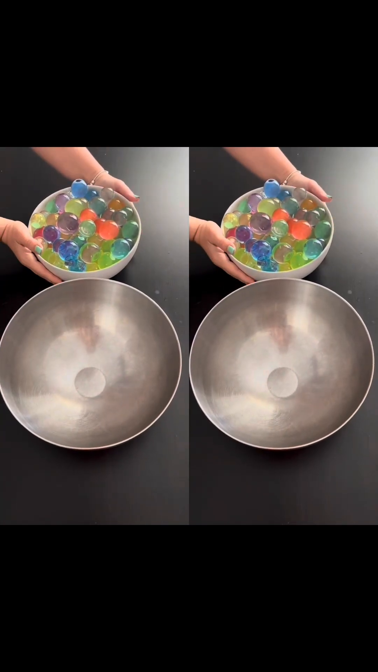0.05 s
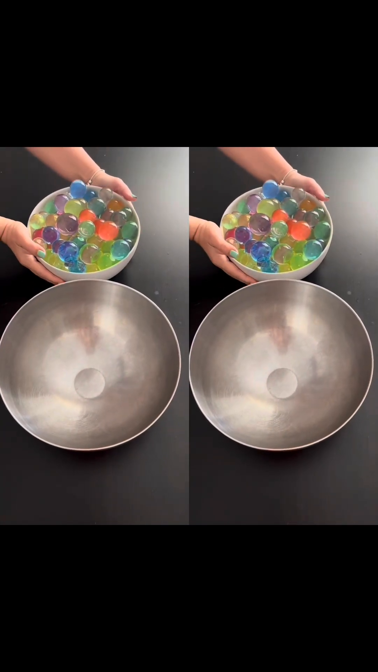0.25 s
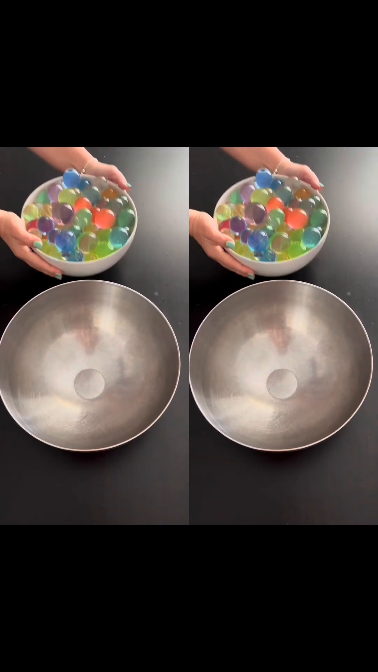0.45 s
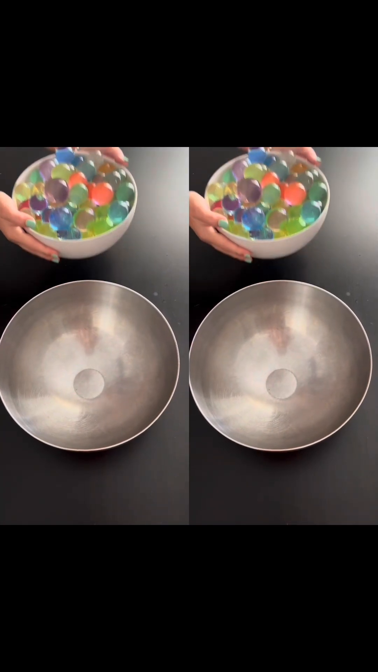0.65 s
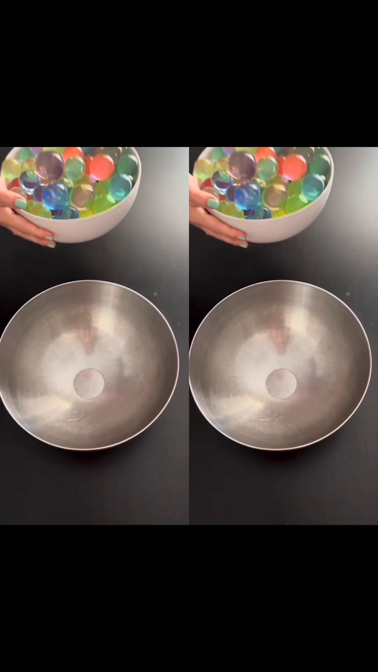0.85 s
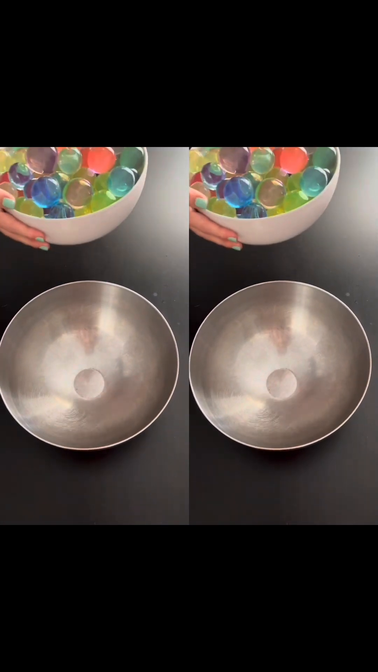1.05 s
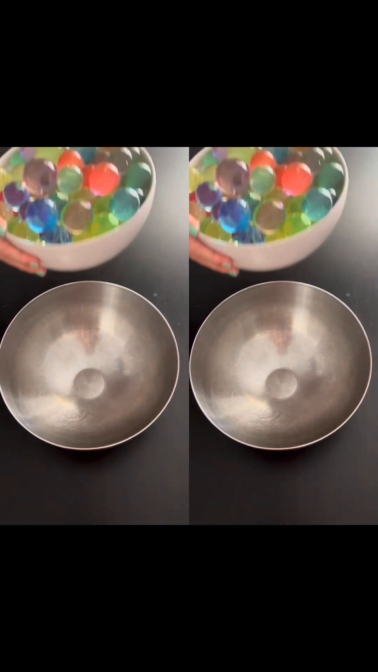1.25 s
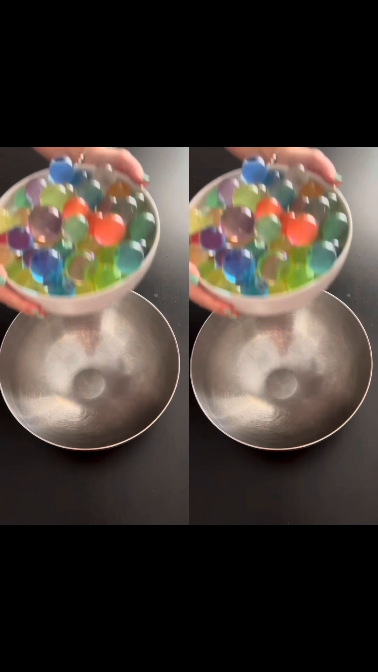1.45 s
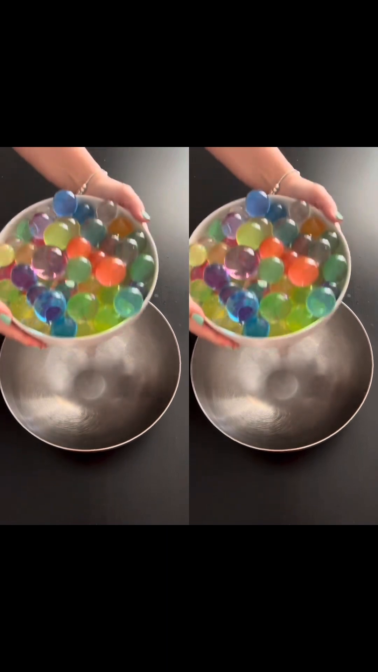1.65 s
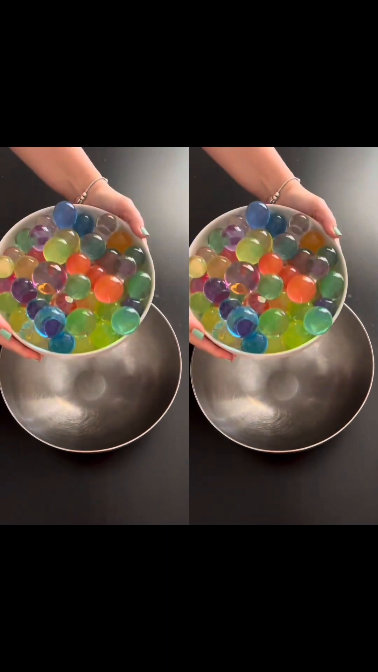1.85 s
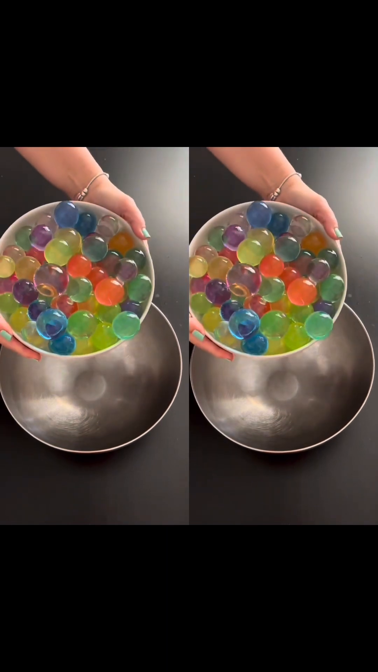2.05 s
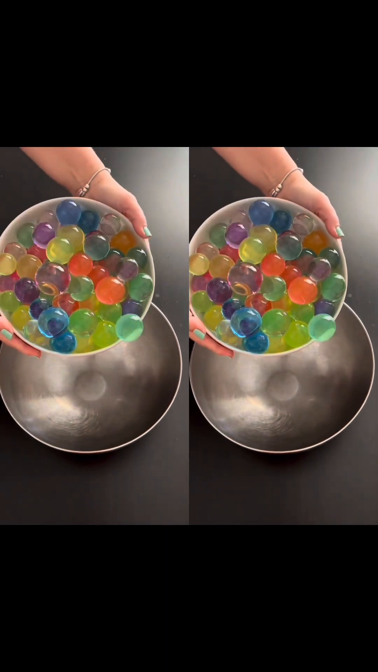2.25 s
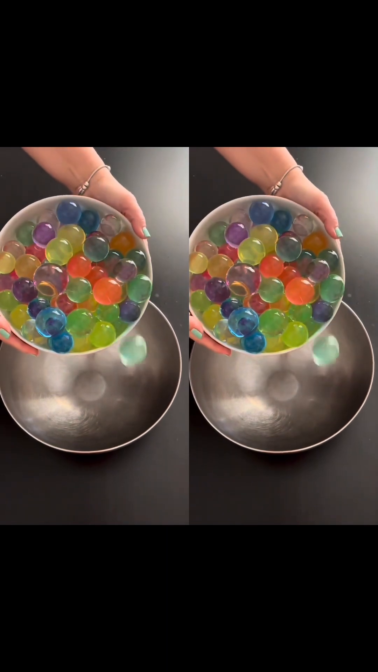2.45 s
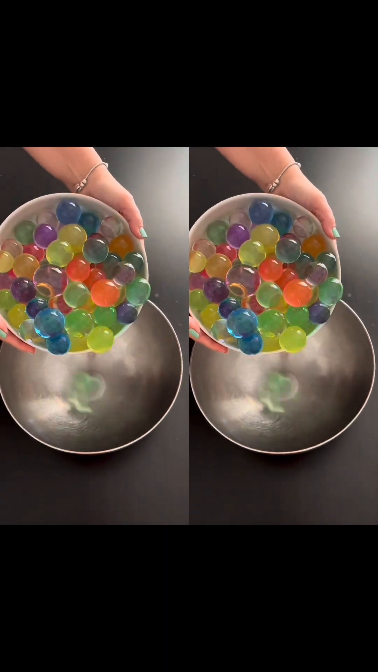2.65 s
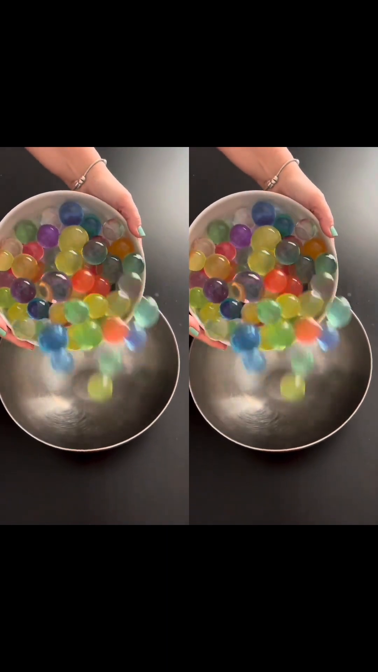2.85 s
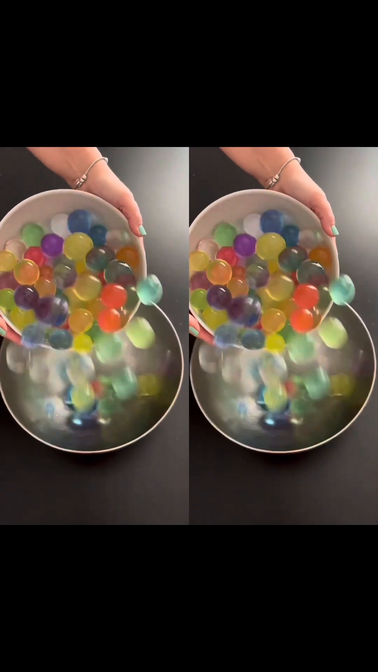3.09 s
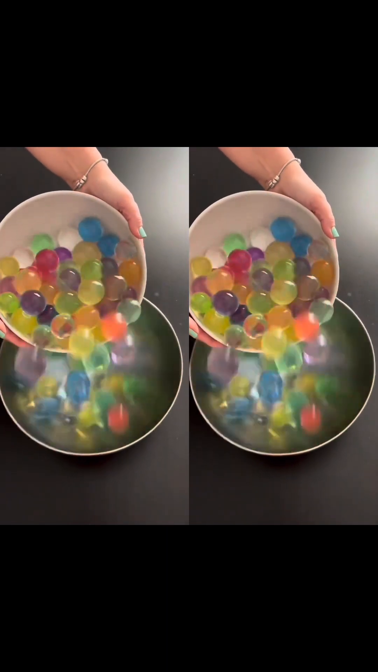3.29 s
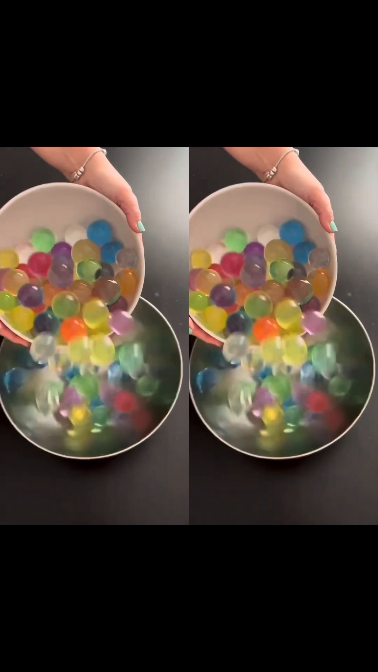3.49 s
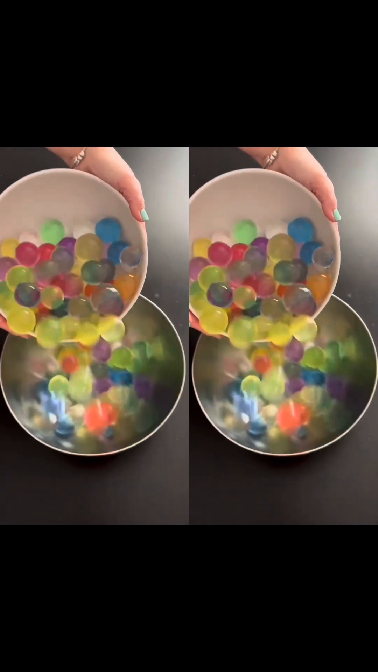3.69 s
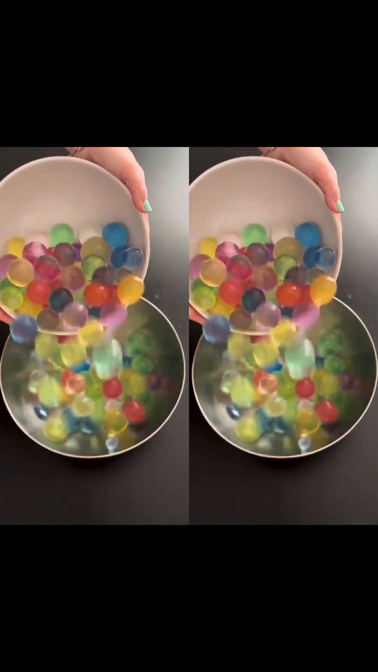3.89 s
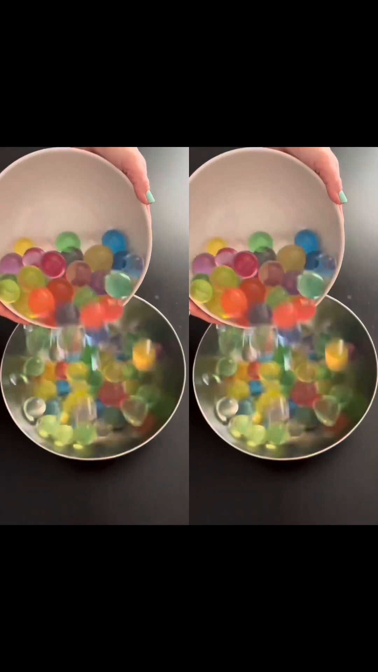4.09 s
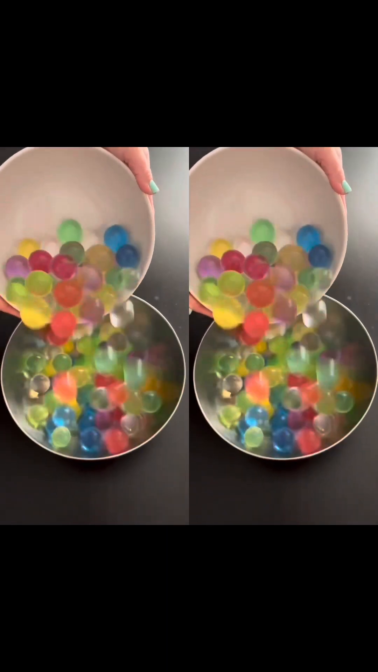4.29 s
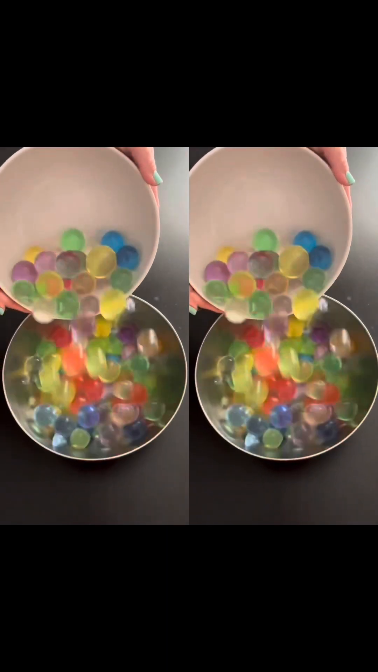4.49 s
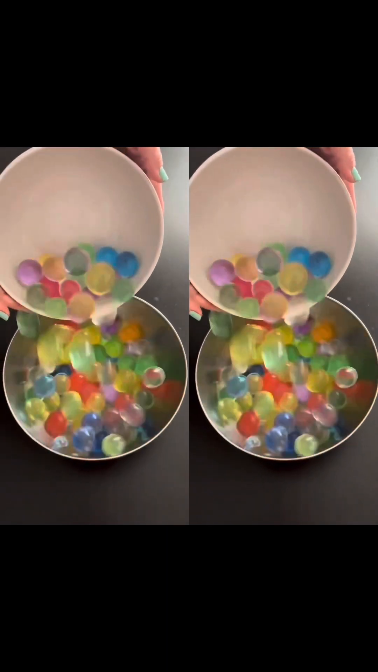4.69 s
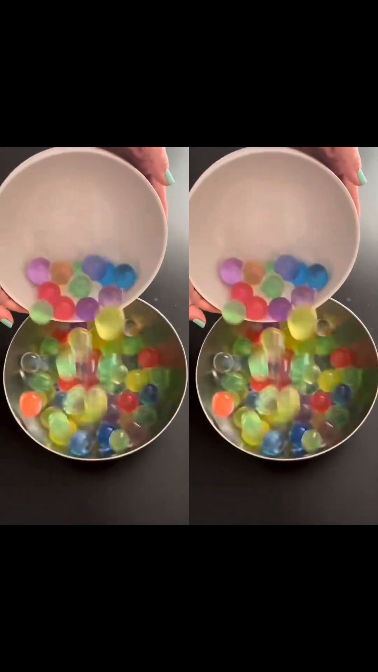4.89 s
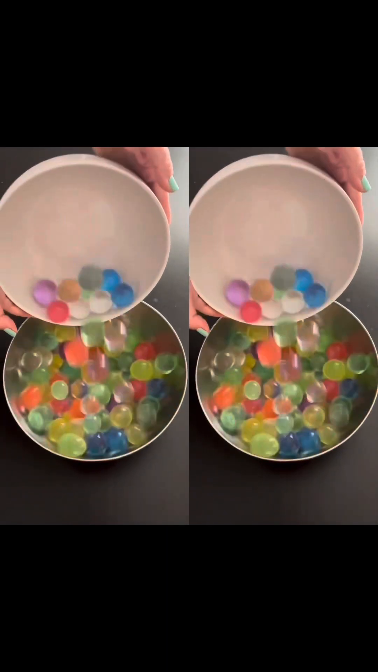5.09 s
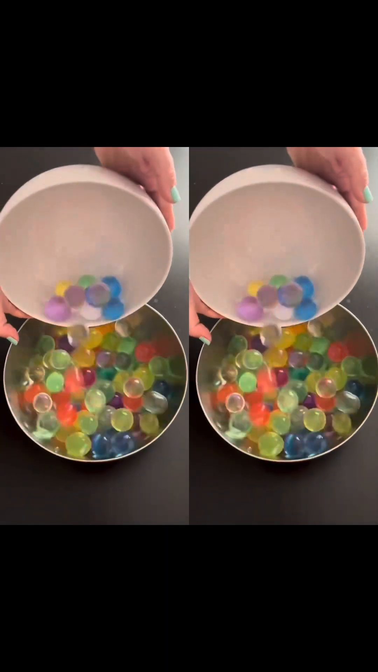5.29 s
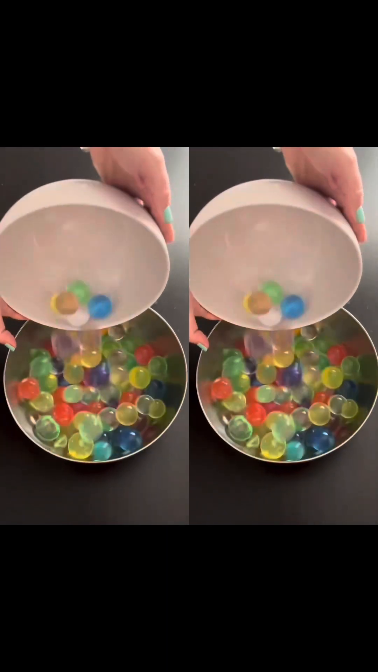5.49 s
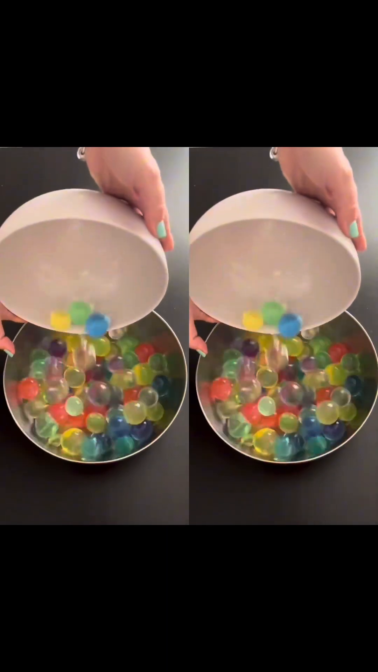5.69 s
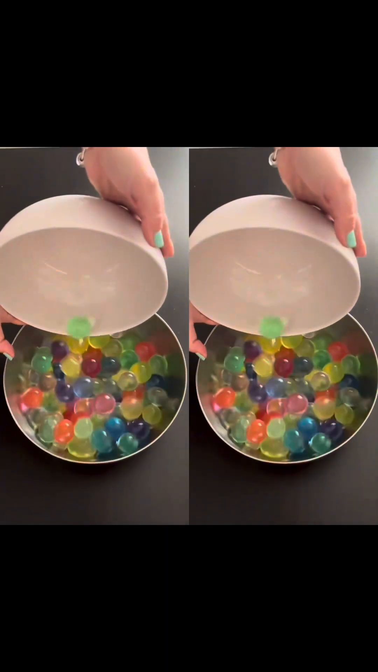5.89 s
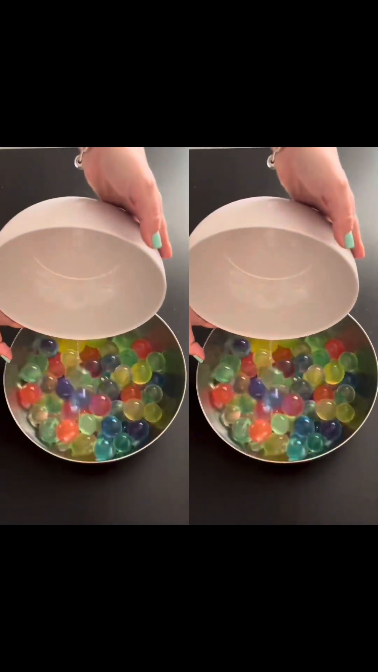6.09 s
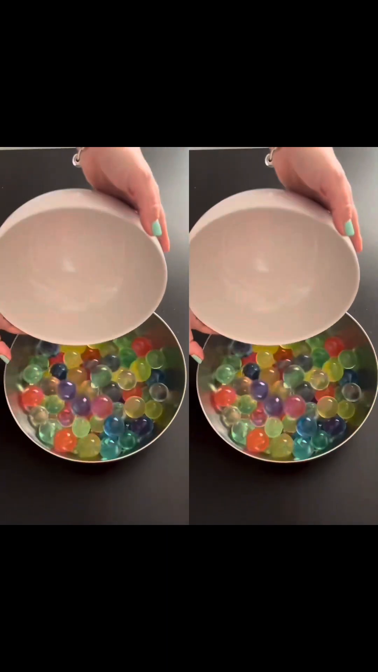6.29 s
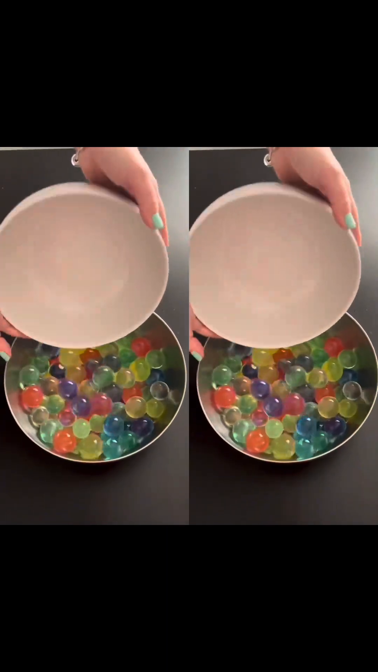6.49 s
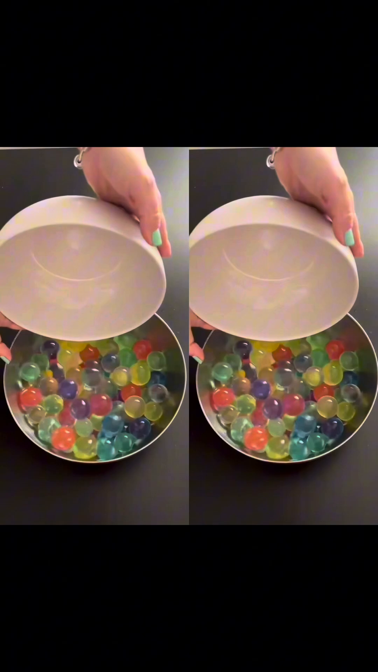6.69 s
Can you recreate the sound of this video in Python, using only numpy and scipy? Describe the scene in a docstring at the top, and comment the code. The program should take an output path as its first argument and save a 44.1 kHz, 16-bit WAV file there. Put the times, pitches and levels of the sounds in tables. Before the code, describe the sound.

After a faint thump and rustle, slippery gel beads tumble into an empty metal bowl with wet slaps, low thuds and brief clanging.

```python
"""On a table in a quiet, humming room, soft wet beads are tipped into a thin metal bowl.
A two-port microphone stands close above. Each landing pushes on the low modes of bowl and table,
water films burst in slaps of coloured noise with pitched plips, and beads smack on beads.
The first heavy beads make the still empty bowl chatter on its base, so that wall and rim ring.
A hand thumps the full bowl at both ends and makes it rustle at the start."""
import sys
import numpy as np
from scipy import signal
from scipy.fft import rfft, irfft, next_fast_len
from scipy.io import wavfile

SR = 44100
rng = np.random.default_rng(int(sys.argv[2]) if len(sys.argv) > 2 else 0)


def bounce(signal):
    """Save signal as a 16-bit WAV file at the path given by the first command-line argument."""
    frames = np.transpose(np.atleast_2d(signal))
    limited = np.clip(frames, -1, 1)
    pcm = np.round(limited * 32767).astype(np.int16)
    wavfile.write(sys.argv[1], SR, pcm)


N = 297542
TIME = np.arange(N) / SR

# Noise spectrum of the room air: (frequency [Hz], density [dB per Hz])
ROOM_SPECTRUM = [(15, -37.5), (40, -5), (86, 2), (125, -11), (240, -10.5), (400, -17.5), (600, -17),
                 (800, -19.5), (1400, -22.5), (2000, -33.5), (3000, -41), (8000, -50), (16000, -59.5)]
# Background, sinking after the pour: (time [s], air level [dB], hum level [dB], whine level [dB])
BACKGROUND = [(0, -56.5, -63.5, -83), (.3, -63, -67, -90), (.6, -63, -70.5, -81.5), (1.2, -65, -72.5, -75),
              (1.8, -62, -73, -76), (2.1, -65, -70.5, -69.5), (2.4, -65.5, -75.5, -74.5),
              (3, -63, -78, -87.5), (6.2, -76, -83, -95), (6.75, -74, -82.5, -100)]
# Share of air noise common to both ports, limited to 0-1: (frequency [Hz], likeness [1])
ROOM_LIKENESS = [(60, 1), (240, 0.71), (950, -1.4), (3770, -0.14), (15000, 0.23)]
# Resonances of the whine: (frequency [Hz], width [Hz], level [dB])
WHINE_MODES = [(461.6, 2.7, 9.5), (907.4, 11, -5), (1480, 150, -17)]
# Reverberation time of the room: (frequency [Hz], t60 [s])
ROOM_T60 = [(100, 0.21), (1000, 0.48), (5000, .25), (14000, 0.085)]
# Microphone noise spectrum: (frequency [Hz], density [dB per Hz])
HISS_SPECTRUM = [(1000, 0), (8000, -2.5), (10000, 2), (13000, 1), (15500, -13.5)]
# Four samples of lead, for sound from afar and through the table: (frequency [Hz], left lead [rad])
FAR_LEAD = [(0, 0), (SR / 2, 4 * np.pi)]
# Equal level at both ports: (frequency [Hz], left over right [dB])
EQUAL_TILT = [(0, 0)]
# Phase between the ports, for beads and for knocks: (frequency [Hz], left lead [rad])
BEAD_LEAD = [(0, 0), (1810, -0.1), (2840, 2.7), (5000, 1.1), (7240, 6.1), (9390, 6.3), (9730, 9.2),
             (11600, 9.6), (12400, 12.6), (14500, 12.5), (15200, 15.7), (16000, 15.6)]
KNOCK_LEAD = [(0, 0), (950, -1.0), (2580, 2.2), (5080, 1.3), (7320, 6.3), (9470, 6.3), (10100, 9.5),
              (11600, 9.5), (12000, 12.6), (14400, 12.4), (15200, 15.7), (16000, 15.6)]
# Level between the ports, for beads and for knocks: (frequency [Hz], left over right [dB])
BEAD_TILT = [(60, 0.0), (180, 0.0), (550, -0.5), (1650, -2.5), (4970, -0.5), (15000, 0.0)]
KNOCK_TILT = [(60, 0.0), (130, 0.0), (290, -1.0), (640, -4.0), (1410, -5.0), (3100, -1.5), (6820, -0.5),
              (15000, 0.0)]
# The pour, as reference levels: (time [s], thudding level [dB], wet patter level [dB])
POUR = [(2.47, -54, -79), (2.68, -34, -72), (2.79, -41, -75), (3.0, -20, -36), (3.06, -32, -41),
        (3.13, -40, -35), (3.2, -25, -44), (3.37, -26.5, -41), (3.43, -36, -43.5), (3.64, -21, -48),
        (3.8, -30, -50.5), (4.2, -27.5, -48), (4.45, -25, -56), (4.59, -32, -53.5), (4.66, -27, -56.5),
        (4.9, -29.5, -52.5), (5.23, -42.5, -65.5), (5.47, -43, -73.5), (5.85, -55.5, -87), (6.42, -78, -99),
        (6.75, -58.5, -91)]
# Thumps of the hand on the full bowl at both ends, and of heavy landings between:
# (time [s], level [dB], share of upper modes [0-1], deep ring [Hz])
THUDS = [(0.155, -40.5, 0.16, 141.7), (0.171, -36, 0.5, 115.5), (0.197, -36.5, 0.97, 128),
         (0.236, -44, 0.66, 112), (2.503, -29, 0.4, 116), (2.593, -17.5, 0.45, 128.7),
         (2.674, -16.5, 0.36, 132.7), (2.791, -23, 0.47, 119), (2.882, -17.5, 0.35, 124),
         (2.956, -18.5, 0.2, 112), (2.973, -24, 0.56, 144), (3.085, -18, 0.2, 132), (3.145, -13, 0.48, 128),
         (3.198, -14.5, 0.6, 120), (3.343, -25.5, 0.66, 135), (3.427, -26.5, 0.07, 132),
         (3.552, -12.5, 0.35, 127.7), (3.581, -18, 0.03, 124), (3.639, -10.5, 0.62, 143),
         (3.738, -15, 0.38, 127.5), (3.857, -10.5, 0.65, 144.7), (3.891, -19, 0.9, 138),
         (3.975, -23, 0.62, 160), (4.088, -18.5, 0.42, 135.8), (4.169, -22.5, 0.7, 153),
         (4.312, -15.5, 0.6, 149), (4.538, -28.5, 0.1, 147), (4.619, -15, 0.59, 141.2),
         (4.699, -31, 0.3, 139), (4.741, -20.5, 0.3, 136), (4.909, -30, 0.25, 143),
         (5.058, -25, 0.12, 142.6), (5.108, -24.5, 0.36, 133.5), (5.161, -30.5, 0.6, 151.3),
         (5.394, -33, 0.78, 143), (5.429, -35, 0.94, 130.7), (5.519, -43, 0, 123.1),
         (5.64, -42.5, 0.66, 113.5), (5.692, -37.5, 0.42, 168), (5.819, -50.5, 0.45, 145.5),
         (5.928, -47.5, 0.5, 174.6), (6.068, -52, 0.63, 146.6), (6.108, -50, 0.5, 174),
         (6.669, -50.5, 0.52, 172.6), (6.71, -60.5, 0.6, 159)]
# Low modes of bowl and table top: (frequency [Hz], width [Hz], level [dB])
BODY_MODES = [(95, 43, -7.5), (136.1, 6.4, 5), (165, 24, -7.5), (244.3, 9.7, 0.5), (270.2, 10, -3.5),
              (277, 16, -4), (337, 120, -12), (467, 50, -15), (590, 34, -10.5), (703, 230, -20.5)]
# Knocks of the base on the table: (time [s], wall ring level [dB], rim ring level [dB])
KNOCKS = [(2.835, -4.5, -20.5), (2.844, -27.5, -20.5), (2.858, -31, -26), (2.885, -2.5, -21),
          (2.894, -10.5, -19), (2.905, -13.5, -19.5), (2.912, -10.5, -18), (2.922, -23, -18.5),
          (2.946, 1.5, -20.5), (2.955, -10, -16.5), (2.973, -7.5, -14.5), (2.978, -8, -14.5),
          (2.994, -27.5, -28.5), (3.005, -15.5, -27), (3.029, -29, -32.5), (3.089, -6.5, -20),
          (3.114, -3, -19), (3.12, -11.5, -15), (3.126, -30, -16), (3.135, -24.5, -19), (3.152, -2.5, -13),
          (3.161, -8.5, -19), (3.167, -22, -22.5), (3.191, -28.5, -27.5), (3.206, -31.5, -28.5)]
# Modes of wall and rim, before the beads damp and detune them: (frequency [Hz], width [Hz], level [dB])
WALL_MODES = [(423, 110, -21.5), (582.6, 56, -8.5), (725, 210, -10.5), (876.5, 66, 1.5), (957, 100, -1),
              (984, 70, -20), (1429, 13, -11)]
RIM_MODES = [(1756, 87, -11), (2000, 160, -4), (2000, 52, -12), (2350, 21, 6.5), (3240, 99, -10),
             (3510, 58, -10), (4010, 12, 0.5), (4340, 43, -4), (4830, 22, 5), (5020, 70, 2.5),
             (5120, 49, 4), (6020, 200, 0), (7700, 270, -26.5), (8255, 700, -23.5)]
# A hand shifts the full bowl: (time [s], rustle level [dB])
RUSTLE = [(0.12, -78), (0.198, -54), (0.34, -81)]
# Beads smacking on beads: (time [s], level [dB], ring [Hz])
SMACKS = [(2.496, -43, 1040), (2.591, -41, 1330), (2.667, -41, 1080), (2.792, -46, 950), (3.267, -51, 920),
          (3.43, -40, 1340), (3.542, -33, 923), (3.577, -34.5, 1190), (3.633, -27.5, 1100),
          (3.74, -48, 1090), (3.779, -47, 1100), (3.829, -35, 1170), (3.856, -27.5, 1150),
          (3.897, -36, 950), (3.972, -34.5, 1480), (4.027, -39, 940), (4.09, -38, 1080), (4.199, -41, 1520),
          (4.308, -34.5, 900), (4.385, -35, 1060), (4.445, -37.5, 1510), (4.47, -40, 929),
          (4.626, -30.5, 900), (4.63, -34, 1000), (4.671, -35, 1170), (4.731, -39, 1050), (4.831, -51, 904),
          (4.87, -52, 1070), (5.056, -45, 1840), (5.09, -43, 1030), (5.119, -43, 1100), (5.388, -53, 1940),
          (5.416, -49, 1273), (5.568, -73, 890), (5.641, -62.5, 1754), (5.69, -65.5, 1756),
          (6.07, -68, 1074)]
# Colour of bead on bead: (frequency [Hz], density [dB per Hz])
DULL_SPECTRUM = [(210, -33.5), (350, -8), (600, -9.5), (800, -21), (1500, -26), (2000, -28.5),
                 (2600, -37.5), (4000, -40), (9000, -46.5)]
# Wet slaps: (time [s], crack level [dB], plip frequency [Hz], plip level [dB])
SLAPS = [(2.4956, -38, 4830, -89), (2.595, -41, 5270, -41.5), (2.665, -53, 5000, -80),
         (2.789, -59.5, 4840, -71), (2.823, -33, 4760, -32), (3.277, -47, 4830, -26),
         (3.342, -42, 5100, -28.5), (3.434, -53, 5020, -35), (3.5034, -48, 5000, -51),
         (3.5387, -33.5, 4900, -70), (3.5764, -43.5, 4940, -66), (3.6202, -29.5, 5150, -35),
         (3.6817, -31, 5150, -32), (3.7878, -48, 5300, -35), (3.8098, -45, 5170, -56),
         (3.824, -40, 5240, -45), (3.854, -40, 4110, -37), (3.967, -38, 6800, -63),
         (4.0273, -26.5, 5200, -35.5), (4.139, -44, 5120, -56.5), (4.1674, -31.5, 4900, -28.5),
         (4.242, -36, 5100, -33), (4.3191, -53, 4560, -56), (4.3588, -54, 2000, -60),
         (4.4172, -41, 5200, -70), (4.477, -39, 5000, -50), (4.485, -35.5, 4010, -37.5),
         (4.544, -50, 2380, -50.5), (4.588, -49, 6800, -52.5), (4.6194, -47, 4900, -69.5),
         (4.6686, -30.5, 5100, -68), (4.681, -40, 7050, -46), (4.785, -43, 4900, -52),
         (4.83, -30.5, 4830, -34), (4.9124, -50, 3790, -36.5), (4.95, -47, 3520, -52.5),
         (5.068, -62.5, 2250, -55), (5.147, -58, 2000, -74), (5.1814, -40, 4700, -46),
         (5.277, -54.5, 2590, -59), (5.4146, -63, 8700, -65), (5.5687, -51, 5220, -82),
         (5.668, -57, 8870, -72.5), (5.789, -73.5, 2495, -84), (6.047, -68, 4980, -95),
         (6.698, -82, 4970, -95.5)]
# Crack, spray and drip of one slap: (level against the crack [dB], t60 [s])
SLAP_STAGES = [(0, 0.011), (-10.5, 0.082), (-18.5, 0.13)]
# Colour of a slap: (frequency [Hz], density [dB per Hz])
WET_SPECTRUM = [(1060, -25), (1800, -26.5), (1990, -16), (2290, -33), (2830, -11.5), (4490, -8), (5060, 0),
                (5810, -2.5), (6550, -6.5), (9210, -12.5), (10700, -15.5), (11800, -9), (13400, -15),
                (15200, -12.5), (16300, -34)]

HUM_HZ = 344.
HISS_DB = -86
RUMBLE_CUT_HZ, BODY_CUT_HZ, EDGE_HZ = 36, 92, 16400
# The table shakes with the pour, swinging less in dB; each landing adds a kick
SHAKE_HZ, SHAKE_WIDTH_HZ = 49.56, 12
SHAKE_DB, SHAKE_EXPONENT, LANDING_SHAKE_DB = -18.5, 0.72, 11.5
DULL_DB, CROWD_DB = -23, -5.5  # dull patter and crowd of small thuds, against the thudding
CONTACT_FORCE, FLURRY_FORCE = 50, 50
FLURRY_DECAY_S, FLURRY_RISE_S = 0.0047, 0.0014  # time constants
BEAD_DAMPING_HZ = 60
TICK_DB = -50.5  # contact tick, against the rim level
JOLT_DB, JOLT_T60_S = -21, 0.13  # jolted beads, against the wall level
PLIP_T60_S, SMACK_T60_S = .045, .03
SQUEAK_HZ, SQUEAK_DB = 3860, -23  # against the rustle


def gain_of(db):
    """Amplitude ratio as the exponential of a level in decibels."""
    return 10 ** (np.asarray(db) / 20)


def evened(x):
    """Normalisation of signal power: scales to rms 1."""
    return x / np.sqrt(np.mean(x ** 2) + 1e-20)


def read(points, hz):
    """Interpolation of a table on a logarithmic frequency axis."""
    table_hz, value = np.transpose(points)
    return np.interp(np.log(hz + 1), np.log(table_hz + 1), value)


def curve(rows, order):
    """Amplitude envelope from one level column, silent before its first row."""
    s = np.transpose(rows)[0]
    return gain_of(np.interp(TIME, s, np.transpose(rows)[order], left=-200))


def ring(x, modes):
    """Modal superposition: damped resonators of alternating sign, driven by x."""
    out = np.zeros(len(x))
    for k, (hz, width, db) in enumerate(modes):
        pole = np.exp((2j * np.pi * hz - np.pi * width) / SR)
        resonance = signal.lfilter([1], [1, -pole], x).imag
        out += (-1) ** k * gain_of(db) * (1 - abs(pole)) * resonance
    return out


def driven(x, gain, modes):
    """Resonant storage: modes ring on after their drive fades; about rms 1 at gain 1."""
    return ring(gain * x, modes) / np.std(ring(x[:2 * SR], modes))


def coloured(x, spectrum):
    """Linear filtering: multiplies the Fourier spectrum by a curve in dB."""
    size = next_fast_len(N)
    gain = gain_of(read(spectrum, np.fft.rfftfreq(size, 1 / SR)))
    return irfft(rfft(x, size) * gain, size)[..., :N]


def shower(per_s, spread_db):
    """Random arrivals: independent blows, most small and a few large."""
    size = gain_of(spread_db * np.minimum(rng.exponential(1, N), 4))
    return size * (rng.random(N) < per_s / SR)


def fading(x, t60):
    """Exponential decay: every blow leaves a trail falling 60 dB in t60 seconds."""
    return signal.lfilter([1], [1, -1000 ** (-1 / (t60 * SR))], x)


def puff(s, db, t60, size=6000):
    """Exponential decay of one burst after a rise of about a millisecond: its place and envelope."""
    at = round(s * SR)
    after = np.arange(min(size, N - at)) / SR
    rise = np.minimum(after / 0.0011, 1)
    return slice(at, at + len(after)), gain_of(db - 60 * after / t60) * rise


def ports(x, lead, tilt):
    """Interaural-type differences: one source reaches two ports with a phase and level step."""
    size = next_fast_len(N)
    hz = np.fft.rfftfreq(size, 1 / SR)
    # each port takes half of the step, in opposite directions
    step = gain_of(read(tilt, hz) / 2) * np.exp(.5j * np.interp(hz, *np.transpose(lead)))
    return irfft(rfft(x, size) * np.array([step, 1 / step]), size)[:, :N]


def room_air():
    """Partial coherence: noise in both ports is a shared field plus independent parts."""
    size = next_fast_len(N)
    same = np.clip(read(ROOM_LIKENESS, np.fft.rfftfreq(size, 1 / SR)), 0, 1)
    shared, *own = rfft(coloured(rng.standard_normal((3, N)), ROOM_SPECTRUM), size)
    apart = irfft(np.sqrt(1 - same) * np.array(own), size)[:, :N]
    together = irfft(np.sqrt(same) * shared, size)[:N]
    return curve(BACKGROUND, order=1) * evened(ports(together, FAR_LEAD, EQUAL_TILT) + apart)


def room_tones():
    """Narrow-band excitation: a steady sine with a noisy skirt, and a wavering whine."""
    skirt = evened(ring(rng.standard_normal(N), [(HUM_HZ, 8, 0)]))
    hum = evened(np.sin(2 * np.pi * HUM_HZ * TIME)) + 0.51 * skirt
    whine = evened(ring(rng.standard_normal(N), WHINE_MODES))
    tones = curve(BACKGROUND, order=2) * hum + curve(BACKGROUND, order=3) * whine
    return ports(tones, FAR_LEAD, [(0, 1.9)])


def echoes(x):
    """Reverberation: sparse taps of random sign, each band with its own decay, other taps per port."""
    taps = np.zeros((2, SR // 2))
    at = np.arange(200, SR // 2 - 20, 20)
    at = at + rng.integers(0, 20, (2, len(at)))
    np.put_along_axis(taps, at, rng.choice([-1., 1.], at.shape), 1)
    hz, t, bands = signal.stft(taps, SR, nperseg=256)
    decay = gain_of(-60 * t / read(ROOM_T60, hz)[:, None])
    tail = signal.istft(bands * decay, SR, nperseg=256)[1]
    return signal.fftconvolve(x, tail / np.linalg.norm(tail[0]), axes=1)[:, :N]


def soft_push():
    """Impulse of finite contact time: a smooth push of 2.4 ms, with room to ring."""
    return np.pad(signal.windows.hann(round(0.0024 * SR)), (0, 9000))


def table_shake(push, flow):
    """Forced resonance of the table, by the steady pour and by each landing after its start."""
    modes = [(SHAKE_HZ, SHAKE_WIDTH_HZ, 0)]
    steady = ring(rng.standard_normal(N), modes)
    shake = driven(steady, gain_of(SHAKE_DB) * flow ** SHAKE_EXPONENT, modes)
    kicks = np.zeros(N)
    for s, db, _, _ in THUDS:
        kicks[round((s - .0025) * SR)] = gain_of(db) * (s > POUR[0][0])
    landings = ring(signal.oaconvolve(kicks, push)[:N], modes)
    return shake + gain_of(LANDING_SHAKE_DB) * landings


def heavy_thuds(push):
    """Mass loading: shifting beads retune the lowest modes; each thud has its share of upper modes."""
    low = np.array([mode for mode in BODY_MODES if mode[0] <= 200])
    high = np.array([mode for mode in BODY_MODES if mode[0] > 200])
    first_swing = np.gradient(push)  # of the wall, heard directly
    bright = ring(push, high)
    bright = bright / abs(bright).max() - 0.067 * first_swing / first_swing.max()
    out = np.zeros(N + len(push))
    for s, db, share, hz in THUDS:
        at = round((s - .0025) * SR)
        deep = ring(push, low * [hz / low[1, 0], 1, 1])
        deep = deep / abs(deep).max()
        out[at:at + len(push)] += gain_of(db) * ((1 - share) * deep + share * bright)
    return out[:N]


def thuds():
    """Impact excitation: heavy and crowded small pushes ring the bowl, while the table shakes."""
    push, flow = soft_push(), curve(POUR, order=1)
    crowd = signal.oaconvolve(shower(90, 2.3) * rng.choice([-1, 1], N), push)[:N]
    bowl = heavy_thuds(push) + gain_of(CROWD_DB) * driven(crowd, flow, BODY_MODES)
    # the bowl is too small to radiate deep bass
    cut = signal.butter(3, BODY_CUT_HZ, "high", fs=SR, output="sos")
    return signal.sosfilt(cut, bowl) + table_shake(push, flow)


def chatter():
    """Repeated impact: a contact and its flurry ring modes detuned and damped by the beads inside."""
    out, flurry = np.zeros(N), shower(2500, 1.2) * rng.choice([-1, 1], N)
    after, modes = np.arange(5000) / SR, np.array(WALL_MODES + RIM_MODES)
    load = rng.standard_normal((len(KNOCKS), 2, len(modes)))  # drawn anew for every knock
    for (s, wall_db, rim_db), (detune, balance) in zip(KNOCKS, load):
        place = slice(round(s * SR), round(s * SR) + 5000)
        swell = np.exp(-after / FLURRY_DECAY_S) * (1 - np.exp(-after / FLURRY_RISE_S))
        contact = FLURRY_FORCE * flurry[place] * swell
        contact[0] = CONTACT_FORCE
        hz = modes[:, 0] * (1 + 0.011 * detune)
        width = modes[:, 1] + BEAD_DAMPING_HZ
        part_db = np.repeat([wall_db, rim_db], [len(WALL_MODES), len(RIM_MODES)])
        db = modes[:, 2] + 3.24 * balance + part_db
        tick = gain_of(rim_db + TICK_DB) * np.gradient(contact)
        out[place] += ring(contact, np.transpose([hz, width, db])) + tick
    return out


def hand_rustle(noise):
    """Friction noise of the shifted bowl: the rustle's envelope, and its thin resonant squeak."""
    rustle = curve(RUSTLE, order=1) * (TIME < RUSTLE[-1][0])
    squeak = evened(ring(noise, [(SQUEAK_HZ, 200, 0)]))
    return rustle, gain_of(SQUEAK_DB) * rustle * squeak


def jolted_beads():
    """Momentum transfer: each knock of the base jolts the beads in the bowl; their envelope."""
    out = np.zeros(N)
    for s, wall_db, _ in KNOCKS:
        place, shape = puff(s, wall_db + JOLT_DB, JOLT_T60_S)
        out[place] += shape
    return out


def bead_smacks(noise):
    """Collision of bead on bead: the envelope of the dull bursts, and their faint rings."""
    bursts, rings = np.zeros(N), np.zeros(N)
    for s, db, hz in SMACKS:
        place, shape = puff(s, db, SMACK_T60_S)
        bursts[place] += shape
        rings[place] += gain_of(-10) * shape * evened(ring(noise[place], [(hz, 150, 0)]))
    return bursts, rings


def wet_slaps(noise):
    """Bursting water films: puffs of noise, each slap with a plip, over a dense patter."""
    slow = evened(fading(shower(98, 4.), 0.065))
    quick = evened(fading(shower(150, 3.5), 0.006))
    puffs = curve(POUR, order=2) * evened(0.87 + slow + 0.44 * quick)
    plips = np.zeros(N)
    for s, db, hz, plip_db in SLAPS:
        for under_db, t60 in SLAP_STAGES:
            place, shape = puff(s, db + under_db, t60)
            puffs[place] += shape
        place, shape = puff(s, plip_db, PLIP_T60_S)
        plips[place] += shape * evened(ring(noise[place], [(hz, 180, 0)]))
    return puffs * evened(coloured(noise, WET_SPECTRUM)) + plips


def patter():
    """Superposition of the bead sounds: wet slaps, and dull noise shaped by bead contacts."""
    noise = rng.standard_normal(N)
    crowd = evened(1.5 + evened(fading(shower(89, 2.5), 0.066)))
    rustle, squeak = hand_rustle(noise)
    bursts, rings = bead_smacks(noise)
    dull = gain_of(DULL_DB) * curve(POUR, order=1) * crowd + rustle + jolted_beads() + bursts
    dull_noise = evened(coloured(rng.standard_normal(N), DULL_SPECTRUM))
    return wet_slaps(noise) + squeak + rings + dull * dull_noise


def scene():
    """Superposition: beads and bowl echo over the room; thuds come through the table, dry."""
    beads = ports(patter(), BEAD_LEAD, BEAD_TILT)
    bowl = ports(chatter(), KNOCK_LEAD, KNOCK_TILT)
    far = echoes(gain_of(-10.5) * beads + gain_of(-13.5) * bowl)
    table = ports(thuds(), FAR_LEAD, EQUAL_TILT)
    return beads + bowl + far + table + room_air() + room_tones()


def record(dry):
    """Transducer limits: microphone hiss, rumble filter, soft overload and band limit."""
    hissy = dry + gain_of(HISS_DB) * coloured(rng.standard_normal(dry.shape), HISS_SPECTRUM)
    rumble_filter = signal.butter(4, RUMBLE_CUT_HZ, "high", fs=SR, output="sos")
    firm = signal.sosfilt(rumble_filter, hissy)
    held = firm / (1 + firm ** 4) ** .25
    band = signal.firwin(511, EDGE_HZ, window=("kaiser", 9), fs=SR)
    return signal.oaconvolve(held, band[None], "same")


dry = scene()
out = record(dry)
bounce(out)
```